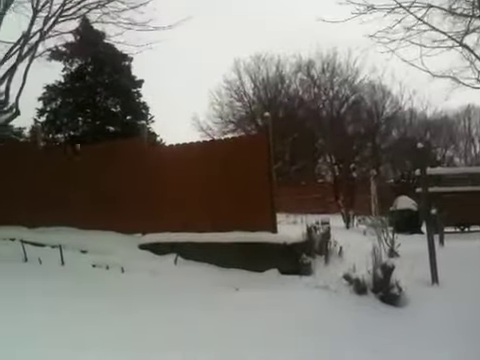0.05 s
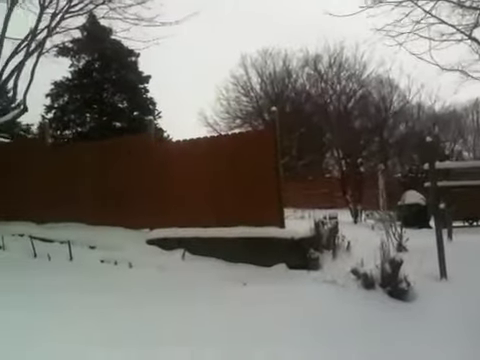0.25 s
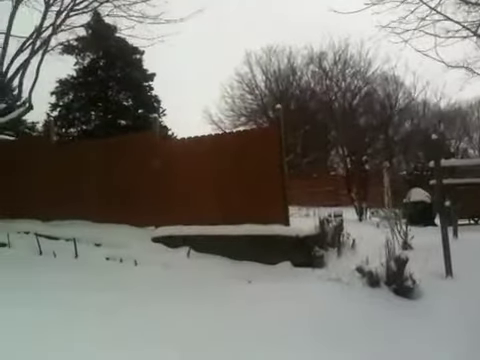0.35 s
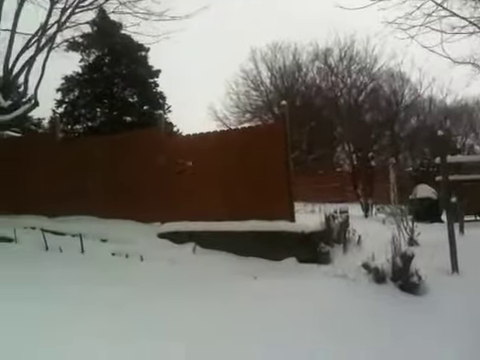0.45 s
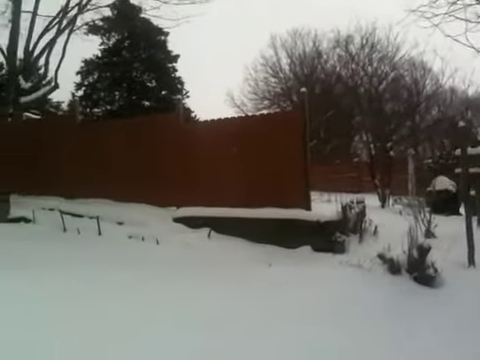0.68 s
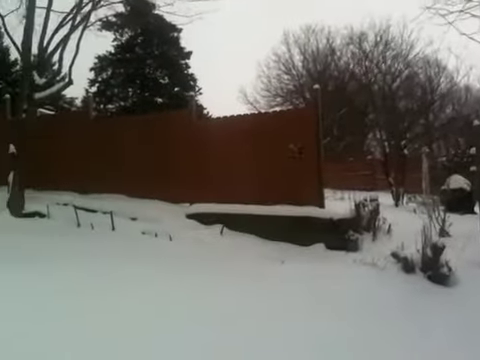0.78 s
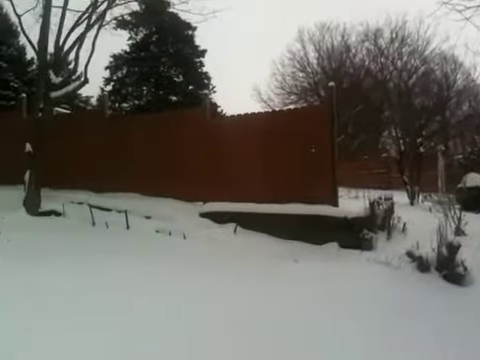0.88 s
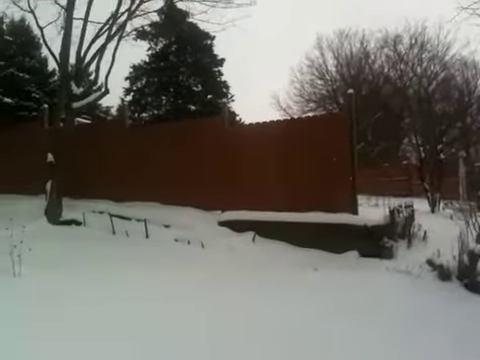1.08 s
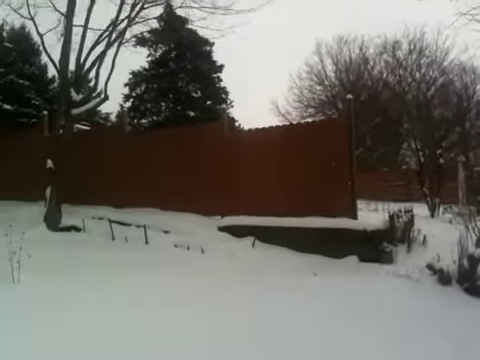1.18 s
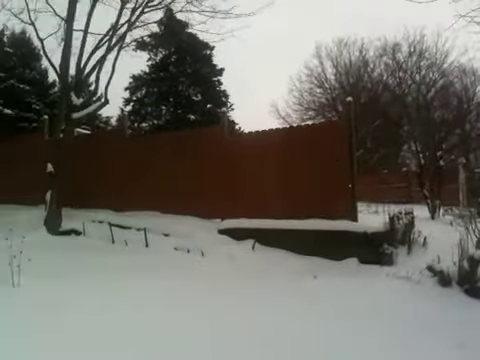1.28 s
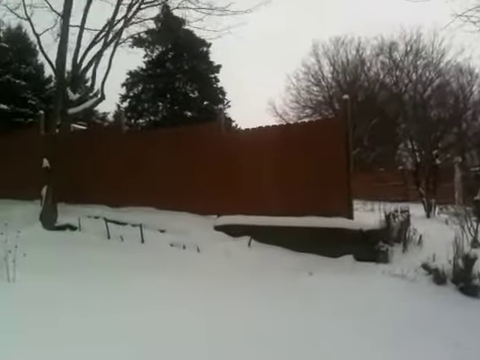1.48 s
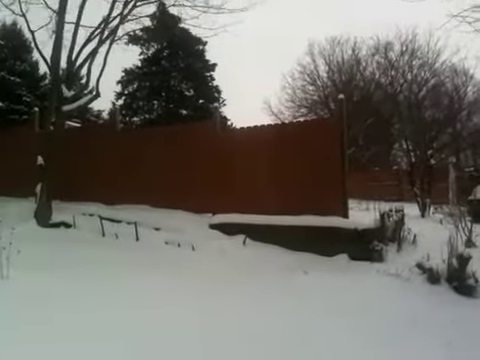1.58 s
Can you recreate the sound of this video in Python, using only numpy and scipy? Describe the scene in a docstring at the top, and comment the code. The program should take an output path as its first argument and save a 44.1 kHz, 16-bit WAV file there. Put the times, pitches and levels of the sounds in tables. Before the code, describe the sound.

Dull handling bumps and low rubbing sound close on the microphone from the start until about 0.5 seconds, strongest near 0.35. After a short lull, a softer flurry follows from 0.9 to 1.2 seconds, with one tiny bump near 1.6. Faint outdoor air and even hiss continue underneath, with a few tiny, thin rustles between 0.6 and 1.5 seconds and a barely audible distant rush late on.

```python
"""A still, snow-covered backyard, heard from a hand-held camera that is being turned.
Faint far air, a distant rush and even microphone hiss, all shaped noise, lie under a few tiny rustles.
In front, dull bumps and low rubbing come in two flurries, most likely from the grip on the case:
soft pushes and tiny slips, each leaving a brief low ring."""
import sys
import numpy as np
from scipy import signal
from scipy.fft import rfft, irfft
from scipy.io import wavfile

SR = 44100
rng = np.random.default_rng(int(sys.argv[2]) if len(sys.argv) > 2 else 0)


def dump_mix(stems):
    """Bounce the given channels to the path in sys.argv[1] as a 16-bit WAV at rate SR."""
    frames = np.atleast_2d(stems).T  # one column per channel
    limited = np.clip(frames, -1, 1)  # hard clip at full scale
    pcm = np.round(limited * 32767).astype(np.int16)
    wavfile.write(sys.argv[1], SR, pcm)


N = 72765


def from_db(db):
    """Decibels to gain."""
    return 10 ** (np.asarray(db) / 20)


def unit_rms(x):
    """Scale to unit power."""
    return x / np.sqrt(np.mean(x ** 2) + 1e-20)


def gain_curve(rows):
    """Gain per sample from (time_s, level_db) points."""
    return from_db(np.interp(np.arange(N) / SR, *np.transpose(rows)))


def butter(x, hz, kind, order):
    """Causal Butterworth filter."""
    return signal.sosfilt(signal.butter(order, hz, kind, fs=SR, output="sos"), x)


def coloured_noise(spectrum):
    """Unit-power noise shaped by (freq_hz, relative_db) points."""
    hz, db = np.transpose(spectrum)
    bins_hz = np.maximum(np.fft.rfftfreq(N, 1 / SR), 1)
    gain = from_db(np.interp(np.log(bins_hz), np.log(hz), db))
    return unit_rms(irfft(rfft(rng.standard_normal(N)) * gain, N))


def add(out, start_s, sound):
    """Mix a sound in at start_s."""
    i = int(start_s * SR)
    out[i:i + len(sound)] += sound[:N - i]


# freq_hz, relative_db
AIR_SPECTRUM = [(25, -26), (50, -14.5), (100, 1.5), (190, -5), (350, 1), (500, -7.5), (800, -6),
                (1300, -11), (2000, -15.5), (3000, -27.5), (6000, -35)]
# time_s, level_db
AIR_LEVEL = [(0, -71.5), (.9, -72.5), (1.65, -71.5)]


def far_air():
    """Still air: low, nearly steady noise."""
    return gain_curve(AIR_LEVEL) * coloured_noise(AIR_SPECTRUM)


# freq_hz, relative_db
RUSH_SPECTRUM = [(300, -19.5), (800, -5.5), (1400, -0.5), (2100, -2.5), (3000, -12.5), (6000, -27)]
# time_s, level_db
RUSH_LEVEL = [(0, -91), (.7, -84.5), (1.1, -85.5), (1.3, -79), (1.42, -81), (1.65, -78.5)]


def distant_rush():
    """Faint midrange noise, swelling towards the end."""
    return gain_curve(RUSH_LEVEL) * coloured_noise(RUSH_SPECTRUM)


# freq_hz, relative_db
HISS_SPECTRUM = [(100, 0.5), (1500, 1), (3000, -0.5), (5000, -1), (8000, -1.34), (11000, -2), (15500, -4)]
# time_s, level_db
HISS_LEVEL = [(0, -75.5), (.6, -74), (1.65, -74.5)]


def mic_hiss():
    """Microphone self-noise, nearly white."""
    return gain_curve(HISS_LEVEL) * coloured_noise(HISS_SPECTRUM)


# start_s, length_s, level_db, centre_hz, width_octaves
RUSTLES = [(0.63, 0.026, -75.5, 10000, .3), (.725, .035, -81, 9900, 0.28), (0.782, .008, -77.5, 4600, .25),
           (.966, 0.01, -70.5, 10800, .35), (1.163, 0.0048, -72, 4700, 0.18),
           (1.375, .011, -75, 4850, 0.18), (1.377, 0.013, -71, 7600, 0.41), (1.379, 0.044, -74, 8200, 1),
           (1.461, 0.057, -79, 7150, .5)]


def rustles():
    """Short, thin brushes of noise that rise quickly and fade."""
    out = np.zeros(N)
    t = np.arange(SR // 8) / SR
    for start_s, length_s, level_db, centre_hz, width_octaves in RUSTLES:
        band_hz = centre_hz * 2 ** (np.array([-.5, .5]) * width_octaves)
        noise = unit_rms(butter(rng.standard_normal(len(t)), band_hz, "band", order=2))
        power = np.interp(t, [0, .25 * length_s, length_s], [0, 1, 0])
        add(out, start_s, from_db(level_db) * noise * np.sqrt(power))
    return out


def case_response(force, highpass_hz, lowpass_hz):
    """Soft contact dulls the force; the case drops the bass, leaving a brief low ring."""
    dulled = butter(force, lowpass_hz, "low", order=7)
    return butter(dulled, highpass_hz, "high", order=3)


# time_s, level_db
RUBBING_LEVEL = [(0, -66.5), (.06, -64.5), (.10, -65), (.15, -56.5), (.22, -53.5), (.275, -61),
                 (.33, -49.5), (.39, -54.5), (.47, -51.5), (.52, -62.5), (.55, -85), (.86, -87.5),
                 (.90, -64), (.96, -61), (1.0, -68.5), (1.06, -59), (1.13, -78.5), (1.55, -82.5),
                 (1.6, -71.5), (1.65, -74.5)]


def grip_rubbing():
    """Tiny random slips through the case, stronger as the grip shifts."""
    slips_per_s, spread_db = 600, 5
    slips = (rng.random(N) < slips_per_s / SR) * rng.choice([-1, 1], N)
    force = slips * from_db(spread_db * rng.standard_normal(N))
    rub = case_response(force, highpass_hz=125.3, lowpass_hz=217.3)
    return gain_curve(RUBBING_LEVEL) * unit_rms(rub)


# start_s, level_db, highpass_hz, lowpass_hz
BUMPS = [(0.0418, -47, 98.5, 194), (0.067, -44.5, 238, 335), (0.0747, -34.5, 75, 265),
         (0.1228, -46, 149.5, 181), (0.149, -47.5, 77, 204), (0.164, -49, 130, 215),
         (0.1805, -45.5, 131, 215), (0.1952, -31, 105, 257), (0.2413, -43, 138, 185),
         (0.319, -41, 174, 174), (0.3394, -35.5, 134, 287), (0.3446, -34.5, 120, 306),
         (0.355, -25.5, 433, 433), (0.358, -20.5, 95, 220.5), (0.3605, -26.5, 77, 187),
         (0.3721, -28.5, 88.3, 192), (0.3753, -36, 424, 469), (0.3781, -22, 79.7, 258),
         (0.4019, -43, 183, 196), (0.435, -41, 194, 388), (0.4383, -38, 212, 211),
         (0.4492, -42.5, 395, 395), (0.4578, -42, 289, 292), (0.4781, -39.5, 135, 218),
         (0.507, -41.5, 76, 261), (0.526, -56.5, 110, 214), (0.8897, -53, 150, 196),
         (0.9068, -48, 129, 210), (0.9408, -52.5, 91, 197), (0.9577, -49, 101, 286), (1.033, -47, 125, 227),
         (1.039, -48, 152, 173), (1.06, -51, 71, 175), (1.0923, -45, 233, 235), (1.176, -50, 62.5, 201),
         (1.594, -62, 119, 221)]


def case_bumps():
    """Soft pushes on the case, each dragging into a muffled scuff of friction."""
    scuff_db, scuff_s = -30.5, 0.0089  # level relative to the thud's peak
    out = np.zeros(N)
    push = signal.unit_impulse(SR // 8)
    t = np.arange(len(push)) / SR
    drag = np.sin(np.pi * np.minimum(t / scuff_s, 1))
    for start_s, level_db, highpass_hz, lowpass_hz in BUMPS:
        thud = case_response(push, highpass_hz, lowpass_hz)
        thud /= np.abs(thud).max()
        friction = butter(rng.standard_normal(len(t)), hz=723, kind="low", order=5)
        friction = butter(friction, hz=408, kind="high", order=2)
        scuff = from_db(scuff_db) * drag * unit_rms(friction)
        add(out, start_s, from_db(level_db) * (thud + scuff))
    return out


def scene():
    """Quiet yard under handling sounds that lose their deep bass in the microphone; mono."""
    mic_highpass_hz = 92
    low_cut = signal.ellip(4, .2, 25, mic_highpass_hz, "high", fs=SR, output="sos")
    handling = signal.sosfilt(low_cut, case_bumps() + grip_rubbing())
    return (handling + rustles() + far_air() + distant_rush() + mic_hiss())[None]


def record(dry):
    """Steep cut of the top treble."""
    lowpass_hz = 15760
    return signal.sosfilt(signal.ellip(12, .1, 70, lowpass_hz, fs=SR, output="sos"), dry)


dry = scene()
out = record(dry)
dump_mix(out)
```